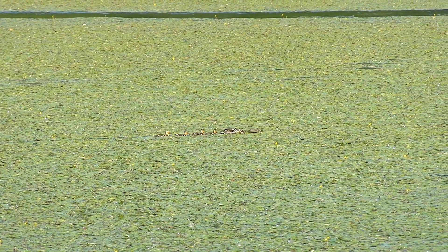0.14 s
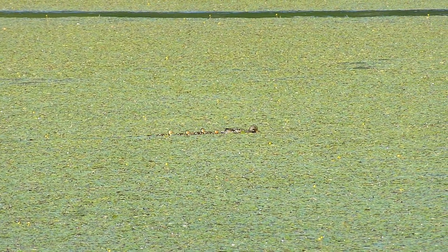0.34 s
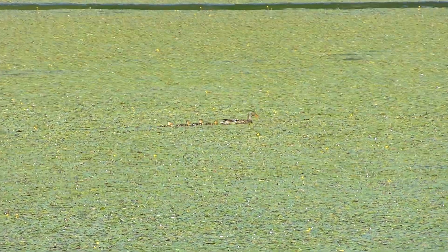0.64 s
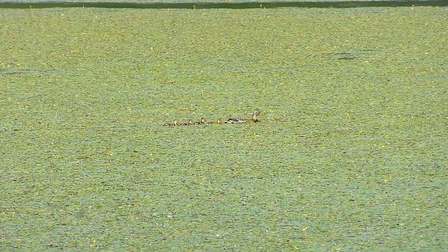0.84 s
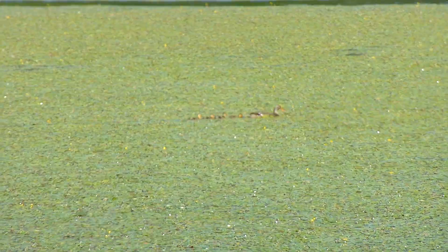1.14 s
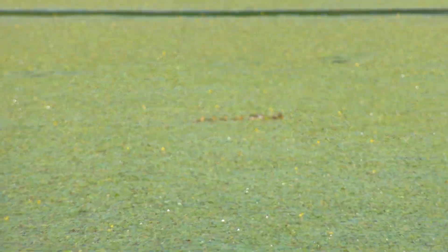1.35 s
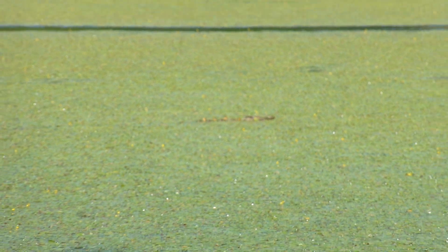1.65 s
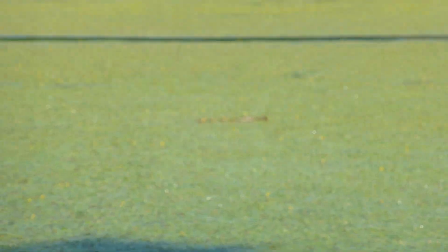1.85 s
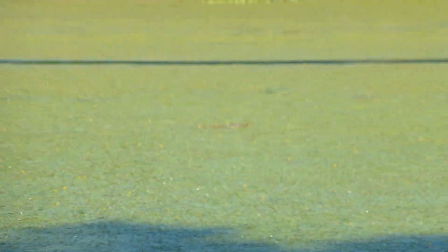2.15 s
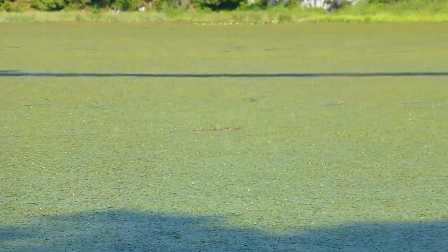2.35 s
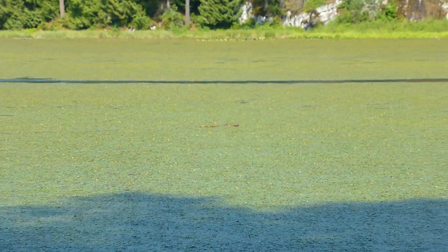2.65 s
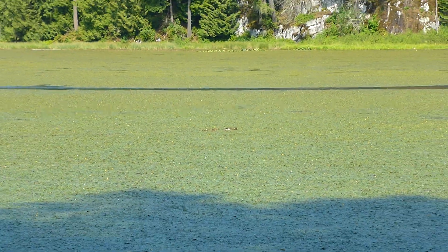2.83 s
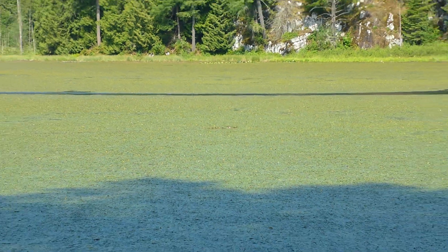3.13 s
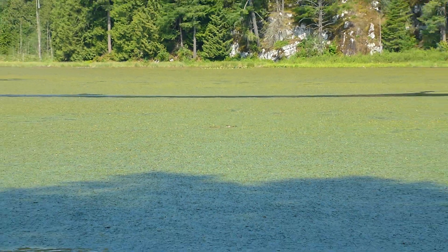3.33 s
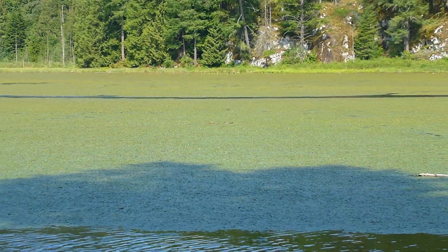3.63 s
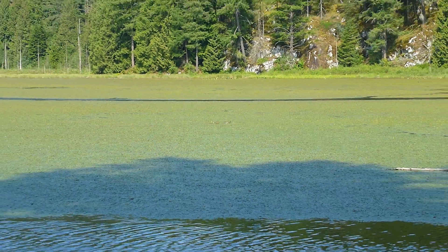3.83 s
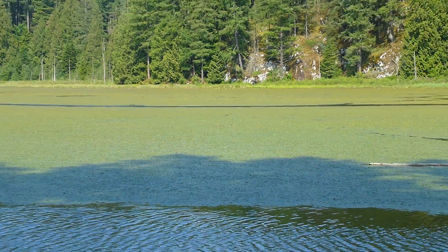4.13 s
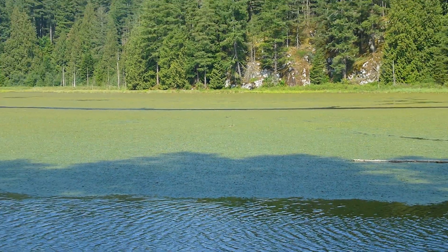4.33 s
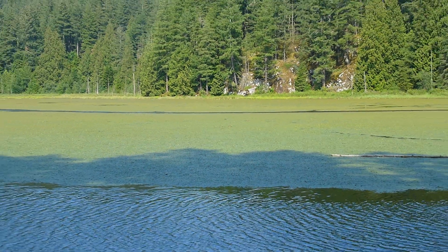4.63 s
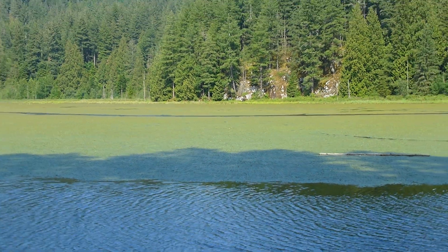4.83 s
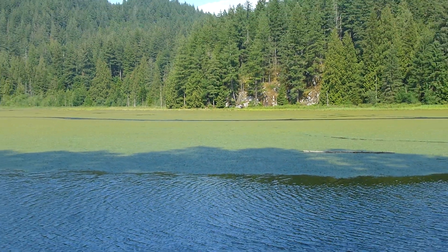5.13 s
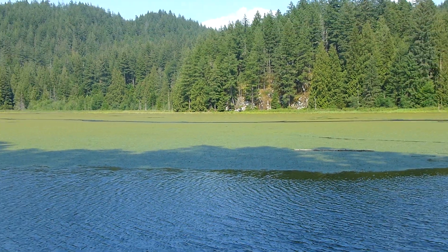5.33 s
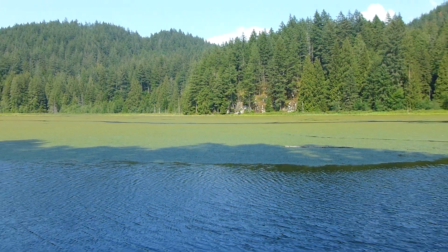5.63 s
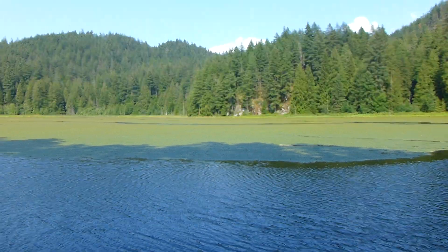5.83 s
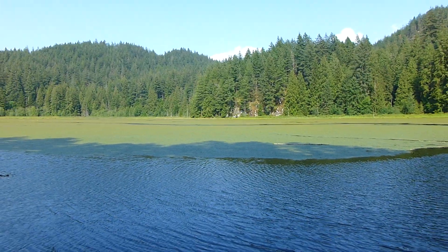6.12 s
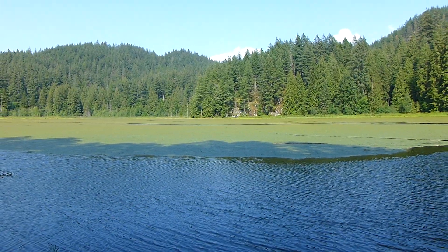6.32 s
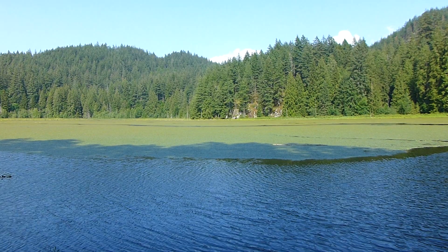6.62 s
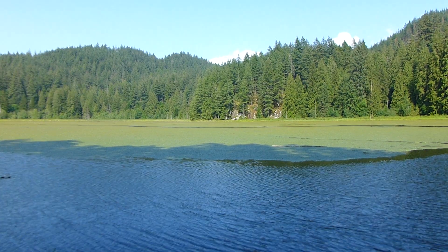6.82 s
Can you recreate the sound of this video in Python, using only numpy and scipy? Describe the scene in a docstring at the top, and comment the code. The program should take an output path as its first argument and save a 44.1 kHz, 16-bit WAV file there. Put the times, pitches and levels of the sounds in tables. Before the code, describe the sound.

Close plastic clicks and a finger rub lead into a camera lens motor whirring steadily, then cutting off with soft knocks.

```python
"""A compact camera's zoom motor runs, heard through the camera body by its built-in stereo microphones.
The gears scrape once a rotor turn and ring the barrel while the case drones. The lens groups bump in their
guides, plastic parts tick and the focus drive hisses in short runs. A finger rubs and pushes the lever,
then lets go with dull thuds. Faint open air lies behind."""
import sys
import numpy as np
from scipy import signal
from scipy.fft import rfft, irfft
from scipy.io import wavfile
from scipy.ndimage import uniform_filter1d

SR = 44100
rng = np.random.default_rng(int(sys.argv[2]) if len(sys.argv) > 2 else 0)


def unload_wav(signal):
    """Save mono or channel-first audio to the path in sys.argv[1] as 16-bit WAV at rate SR, clipped to [-1, 1]."""
    wavfile.write(
        sys.argv[1],
        SR,
        np.round(np.clip(np.atleast_2d(signal).T, -1, 1) * 32767).astype(np.int16),
    )


N = 307377
TIME = np.arange(N) / SR
START_S, STOP_S, ROTOR_HZ = 0.738, 6.466, 186.8


def undb(db):
    """Decibels to gain."""
    return 10 ** (np.asarray(db) / 20)


def unit(x):
    """Scale to rms 1."""
    return x / np.sqrt(np.mean(x ** 2))


def curve(rows):
    """Each column after the first, joined by straight lines in time."""
    times_s, *columns = np.transpose(rows)
    return np.squeeze([np.interp(TIME, times_s, column) for column in columns])


def strokes(rows, attack_s, release_s):
    """Gain that rises, holds and dies away. Each row: start in seconds, length in seconds, level in dB."""
    return sum(undb(db) * np.clip((TIME - start_s) / attack_s, 0, 1)
               * np.exp(-np.maximum(TIME - start_s - length_s, 0) / release_s)
               for start_s, length_s, db in rows)


def noise():
    """White noise."""
    return rng.standard_normal(N)


def walk(rate_hz):
    """Smooth random wander, rms 1."""
    knots = rng.standard_normal(int(N / SR * rate_hz) + 3)
    return unit(np.interp(TIME * rate_hz, np.arange(len(knots)), knots))


def butter(x, hz, kind, order):
    """Butterworth low- or high-pass."""
    return signal.sosfilt(signal.butter(order, hz, kind, fs=SR, output="sos"), x + 1e-18)


def colour(x, outline):
    """Minimum-phase filter. Each row: frequency in Hz, gain in dB."""
    hz, db = np.transpose(outline)
    bins_hz = np.fft.rfftfreq(N, 1 / SR) + 1e-3
    gain = undb(np.interp(np.log(bins_hz), np.log(hz), db))
    cepstrum = irfft(np.log(gain), N)
    cepstrum[1:] *= 2 * (np.arange(1, N) < N // 2)
    return irfft(rfft(x) * np.exp(rfft(cepstrum)), N)


def ring(force, modes, wander_db=0.74):
    """Friction noise under a varying force excites resonances that swell independently; rms 1."""
    ringing = 0
    for hz, width_hz, db in modes:
        b, a = signal.iirpeak(hz, hz / width_hz, SR)
        swell = undb(db + wander_db * walk(11))
        ringing += swell * signal.lfilter(b, a, signal.lfilter(b, a, force * noise()))
    return unit(ringing)


def rotor_turns(wobble=0.024):
    """Turns made by the rotor, whose speed wavers a little."""
    return np.cumsum(ROTOR_HZ * (1 + wobble * walk(30))) / SR


def gear_contact(turns, grip=2.6, grip_s=0.00035, backlash_s=0.00013, peak_load_s=3.87, load_span_s=3.7):
    """Teeth catch once a turn, hardest on every third turn and in mid travel. Returns force and clicks."""
    turn = turns.astype(int)
    scatter, late = rng.standard_normal((N // 100, 2)).T
    load = np.exp(-((TIME - peak_load_s) / load_span_s) ** 2)
    strength = load * undb(2 * scatter[turn] + 0.5 * (turn % 3 == 0))
    force = 1 + grip * strength * np.exp(-(turns % 1) / ROTOR_HZ / grip_s)
    starts = np.flatnonzero(np.diff(turn)) + 1
    play = (backlash_s * SR * late[:len(starts)]).astype(int)
    clicks = np.bincount(np.clip(starts + play, 0, N - 1), strength[starts], N)
    return force / np.sqrt(uniform_filter1d(force ** 2, SR // 10)), clicks


def zoom_motor(turns, contact, clicks, output_turn_s=0.274, tight_spot_s=4.065):
    """Gears click, scrape and ring their box; the sliding barrel and the brushes sound with them."""
    # Each row: time in seconds, relative rasp level in dB, relative whine level in dB.
    gear_load = [(.8, -50, -50), (1.05, -45, -50), (1.25, -46.5, -51), (1.55, -43, -48.5), (2.1, -41, -48),
                 (2.45, -44, -46), (2.65, -44, -43.5), (3.25, -42.5, -42), (3.6, -44.5, -43),
                 (4.55, -41, -42), (5.05, -39, -40), (5.22, -44, -41.5), (6.44, -43.5, -45.5)]
    # Each row: frequency in Hz, width in Hz, gain in dB.
    gearbox_modes = [(3802, 336, 1), (4520, 670, -4.5), (4855, 390, -2.5)]
    whine_modes = [(4057, 336, 0)]
    # Each row: frequency in Hz, gain in dB.
    tooth_spectrum = [(300, -42), (1500, -30), (3000, -16.5), (3550, -8.5), (4030, 0.5), (4300, -5.5),
                      (4800, -5), (5400, -18), (7500, -35.5), (15500, -44)]
    scrape_spectrum = [(40, -35), (300, -22.5), (700, -18.5), (1200, -22), (1650, -19), (2300, -16.5),
                       (3200, -14), (5500, -16.5), (7500, -51), (9000, -21), (13300, -30.5), (15500, -24.5)]
    tight = np.cos(2 * np.pi * (TIME - tight_spot_s) / output_turn_s)  # friction of the slow output gear
    rasp, whine = undb(curve(gear_load) + 0.5 * tight)
    slide = undb(-42.5 - 1.09 * (TIME - START_S) + 0.36 * tight)
    gears = rasp * ring(contact, gearbox_modes) + whine * ring(contact, whine_modes, wander_db=0.7)
    teeth = undb(-2.5) * np.sqrt(rasp * whine) * unit(colour(clicks, tooth_spectrum))
    scrape_gain = undb(-5.5) * np.sqrt(np.hypot(rasp, whine) * slide)
    scrape = scrape_gain * unit(colour(np.sqrt(contact) * noise(), scrape_spectrum))
    drive = undb(-2) * gears + teeth + scrape + barrel(contact, slide)
    sizzle = brushes(turns, tight)
    running = np.clip((TIME - START_S) / 0.015, 0, 1) * np.clip((STOP_S - TIME) / 0.001, 0, 1)
    waver, flutter = undb(0.5 * walk(14)), undb(0.5 * walk(60))
    return running * waver * (flutter * drive + sizzle)


def barrel(contact, slide, groan_rise_db_per_s=7):
    """The sliding barrel hisses, catches briefly and groans more as the lens nears the wide end."""
    # Each row: start in seconds, length in seconds, level in dB.
    catches = [(1.88, 0.07, -55), (2.34, .06, -51), (2.6, 0.077, -48), (2.9, 0.13, -55), (3.71, 0.062, -57),
               (3.97, 0.16, -59), (4.29, 0.045, -59), (4.56, 0.062, -56), (5.09, .07, -54),
               (6.17, 0.041, -56)]
    # Each row: frequency in Hz, width in Hz, gain in dB.
    barrel_modes = [(4740, 340, -1.5), (5640, 940, 2.5), (6400, 1300, -3.5)]
    groan_modes = [(1300, 340, 0), (2100, 450, -5)]
    friction = undb(-3) * slide + strokes(catches, attack_s=0.025, release_s=0.023)
    hiss = friction * ring(np.sqrt(contact), barrel_modes)
    groan = undb(-49 - groan_rise_db_per_s * (STOP_S - TIME)) * ring(contact, groan_modes)
    return hiss + groan


def brushes(turns, tight, sizzle_db=1.84, pinion_db=1.5):
    """Brushes sizzle in the motor can, swelling every third turn."""
    # Each row: time in seconds, relative level in dB.
    brush_levels = [(.8, -46.5), (1.55, -45), (2.3, -45), (2.7, -43), (3.8, -46.5), (4.4, -44), (5.1, -44),
                    (5.35, -47), (6.44, -44.5)]
    # Each row: frequency in Hz, width in Hz, gain in dB.
    can_modes = [(8240, 790, -3), (9415, 1020, 1.5), (11040, 860, -1), (12830, 1200, -4.5)]
    force = undb(sizzle_db * walk(150) + pinion_db * np.cos(2 * np.pi * turns / 3))
    return undb(curve(brush_levels) - 1.5 + 0.75 * tight) * ring(force, can_modes, wander_db=0.8)


def case_drone(hum_hz=176, hum_width_hz=55, hum_rest_db=-72):
    """Hand and gear train shake the case: low resonances over an uneven rumble."""
    # Each row: time in seconds, relative drone level in dB, relative rumble level in dB.
    shake = [(0, -50, -62), (.55, -55, -56.5), (.7, -47, -60.5), (1.3, -48.5, -59.5), (1.8, -45.5, -51),
             (2.3, -41.5, -45.5), (2.8, -42.5, -49.5), (3.45, -42.5, -49.5), (3.9, -46, -53),
             (4.95, -45.5, -51), (5.6, -50.5, -53), (6.2, -46, -48.5), (6.45, -50, -50.5), (6.5, -54, -58),
             (6.58, -45.5, -49), (6.72, -62, -79), (6.97, -68, -57)]
    # Each row: frequency in Hz, width in Hz, gain in dB.
    case_modes = [(436.3, 59.7, 0.5), (561, 44, -15)]
    # Each row: centre in seconds, half length in seconds, level in dB.
    grip_booms = [(.27, 0.57, -55.5), (0.85, 0.21, -54.5), (3.4, 0.42, -55.5), (5.29, 0.18, -55)]
    # Each row: frequency in Hz, gain in dB.
    rumble_spectrum = [(40, -50), (70, -34), (110, -16), (180, -4.5), (290, 0.5), (400, 3), (455, -2.5),
                       (500, -17.5), (600, -13), (800, -19.5), (1500, -28)]
    drone_db, rumble_db = curve(shake)
    tone = undb(drone_db + 1 + walk(22)) * ring(1, case_modes)
    grip = sum(undb(db) * np.exp(-((TIME - at_s) / half_s) ** 2) for at_s, half_s, db in grip_booms)
    hum = (undb(hum_rest_db) + grip) * ring(1, [(hum_hz, hum_width_hz, 0)])
    surges = noise() * undb(2.5 * walk(30))
    return tone + hum + undb(rumble_db + 6) * unit(colour(surges, rumble_spectrum))


def case_throbs():
    """The case's main resonance swells briefly into a nearly pure tone."""
    # Each row: centre in seconds, peak in dB, half length in seconds, pitch in Hz.
    throbs = [(0.597, -30, 0.0043, 420), (0.611, -31.5, 0.004, 420), (0.772, -28, 0.0054, 430),
              (2.206, -29, 0.014, 440), (2.332, -31, 0.0077, 435), (2.374, -30.5, .012, 444),
              (2.456, -23, 0.0082, 438), (2.66, -28.5, .016, 427), (2.811, -27, 0.008, 438),
              (2.865, -27.5, 0.0089, 400), (3.091, -28.5, 0.0047, 426), (3.402, -32, 0.0094, 448),
              (4.309, -33, 0.0065, 424), (4.36, -30.5, 0.0066, 437), (5.412, -31.5, 0.011, 440),
              (6.223, -33, 0.011, 445)]
    return sum(undb(db) * np.exp(-((TIME - at_s) / half_s) ** 2) * np.sin(2 * np.pi * hz * (TIME - at_s))
               for at_s, db, half_s, hz in throbs)


def knocks(rows, push, wind_cut_hz=265, pan_db=-6.5, sharp_ms=0.43):
    """The microphones' wind filter turns each push on the case into a swing. Returns mid and side."""
    mid, side, t_ms = np.zeros(N), np.zeros(N), 1000 * TIME[:SR // 25]
    for start_s, db, rise_ms, bass_hz in rows:
        swing = -butter(push(rise_ms, t_ms), wind_cut_hz, "high", order=2)
        swing = butter(swing, bass_hz, "high", order=2)
        swing *= undb(db) / np.abs(swing).max()
        left = undb(pan_db * (rise_ms > sharp_ms))  # all but the sharpest lean right
        mid[int(start_s * SR):][:len(t_ms)] += swing
        side[int(start_s * SR):][:len(t_ms)] += swing * (left - 1) / (left + 1)
    return np.array([mid, side])


def pulse(rise_ms, t_ms, roundness):
    """Smooth force pulse, peak 1 at rise_ms."""
    phase = t_ms / rise_ms
    return (phase * np.exp(1 - phase)) ** roundness


def lens_bumps(roundness=5.5, soft_ms=2.46, case_cut_hz=2000, spread_hz=300):
    """Lens groups and lever bump the case, one small edge first. Returns mid and side."""
    # Each row: start in seconds, peak in dB, rise in ms, bass cutoff in Hz.
    bumps = [(0.1358, -19.5, 1.83, 90), (0.197, -28, 0.74, 150), (.2225, -29, 1.35, 150),
             (.25, -36, 1.2, 200), (.279, -39, 1.9, 130), (.307, -35, 1.3, 180), (0.4916, -21.5, 1.5, 89.5),
             (.516, -32, 3.5, 130), (0.5925, -26, 0.47, 200), (.764, -33, 0.38, 200),
             (0.767, -25, 1.34, 100), (0.8061, -25.5, 1.2, 130), (1.032, -37, 3.3, 90),
             (1.1473, -12.5, 0.37, 294), (1.306, -39, 2.6, 110), (1.494, -30.5, 0.86, 110),
             (1.592, -38, 3.4, 60), (1.78, -31, 0.49, 200), (1.815, -24.5, 0.6, 130),
             (2.0594, -25.5, 1.35, 130), (2.336, -26, 1.1, 130), (2.4463, -24.5, 0.93, 150),
             (2.9847, -21, 0.87, 100), (3.2835, -26, 0.54, 110), (3.4782, -11, 0.68, 50.4),
             (3.575, -23.5, 1.3, 110), (3.672, -33, 2.5, 120), (4.09, -31.5, 0.75, 200),
             (4.367, -25.5, 0.81, 150), (4.399, -30.5, 0.69, 110), (4.714, -36, 0.77, 170),
             (4.747, -24, 1.35, 121), (4.8914, -24, 0.8, 130), (4.96, -25.5, 0.67, 130),
             (5.042, -27, 1.1, 130), (5.0717, -24, 0.9, 130), (5.2632, -18, 0.77, 70),
             (5.287, -14, 1.9, 90), (5.38, -26, 1.1, 150), (6.299, -29.5, 0.45, 250),
             (6.4852, -23.5, 0.45, 170)]

    def hard_push(rise_ms, t_ms):
        hardness = max(1 - (rise_ms / soft_ms) ** 4, 0)
        edge = 2 * undb(-19) * hardness * pulse(0.13 * rise_ms, t_ms, roundness)
        push = butter(pulse(rise_ms, t_ms, roundness) + edge, case_cut_hz, "low", order=4)
        return 2 * butter(push, spread_hz, "low", order=1) - push  # lows cross the case later than highs

    return knocks(bumps, hard_push)


def release_thuds(skin_hz=900):
    """The finger lets go of the lever: pushes cushioned by the fingertip. Returns mid and side."""
    # Each row: start in seconds, peak in dB, rise in ms, bass cutoff in Hz.
    thuds = [(6.4612, -18, 1.1, 280), (6.4632, -13, 1.6, 262), (6.4708, -13, 1.66, 220),
             (6.5448, -9, 1.6, 201), (6.5573, -13, 1.87, 171), (6.64, -16, 1.46, 170),
             (6.7008, -11.5, 1.58, 140)]

    def soft_push(rise_ms, t_ms):
        return butter(pulse(rise_ms, t_ms, roundness=4), skin_hz, "low", order=5)

    return knocks(thuds, soft_push)


def plastic_ticks(build_s=0.00019, decay_s=0.0013, part_q=10):
    """A sharp contact and brief chatter ring the struck part and the shell; low parts touch more softly."""
    # Each row: start in seconds, relative level in dB, pitch of the part in Hz, gain of its ring in dB.
    ticks = [(.572, -36, 5000, 6), (0.5918, -16, 2580, 6), (0.596, -20, 2000, 14), (0.614, -20, 4340, 6),
             (.671, -17, 4180, 15.5), (0.698, -24, 4100, 16), (0.7157, -19.5, 3500, 4),
             (0.737, -26.5, 8800, 14), (0.7638, -19, 2600, 6), (0.77, -22.5, 2800, 6),
             (1.1468, -15.5, 1170, 10), (1.147, -20.5, 3600, 14), (1.9849, -21, 3580, 19),
             (3.478, -19, 1720, 9), (4.033, -31, 4720, 14), (4.576, -24, 4000, 20), (5.287, -24, 1900, 10),
             (6.0232, -13.5, 3250, 12), (6.0242, -18, 5200, 4), (6.486, -22.5, 3560, 12),
             (6.534, -22, 4600, 9), (6.5902, -18.5, 4080, 17), (6.592, -22, 4670, 10),
             (6.6085, -29, 4100, 12), (6.629, -29, 2500, 12), (6.667, -32, 4250, 15),
             (6.868, -38, 4400, 19), (6.918, -34.5, 4000, 17)]
    # Each row: frequency in Hz, gain in dB.
    shell_spectrum = [(40, -28), (300, -7), (1200, -1.5), (2000, -8.5), (2800, -8), (3600, 0), (4150, 3),
                      (4900, 6), (5700, -11), (7500, -20), (9500, -13), (12000, -32), (15500, -26)]
    blows, parts, t = np.zeros(N), np.zeros(N), TIME[:SR // 100]
    chatter = 0.33 * np.minimum(t / build_s, 1) * np.exp(-t / decay_s)
    for start_s, db, hz, part_db in ticks:
        blow = undb(db) * ((t == 0) + chatter * rng.standard_normal(len(t)))
        part = signal.lfilter(*signal.iirpeak(hz, part_q, SR), blow)
        blows[int(start_s * SR):][:len(t)] += butter(blow, 1.57 * hz, "low", order=2)
        parts[int(start_s * SR):][:len(t)] += undb(part_db) * part
    return undb(9) * colour(blows, shell_spectrum) + parts


def focus_drive(width_hz=1700, flutter_db=4):
    """A smaller, faster drive hisses at another pitch on each run."""
    # Each row: start in seconds, length in seconds, level in dB, pitch in Hz.
    runs = [(0.723, 0.013, -37, 8860), (0.918, 0.213, -44, 10100), (1.297, 0.13, -47.5, 10300),
            (1.868, 0.31, -48.5, 9000), (4.56, 0.12, -45.5, 9850), (4.8, 0.075, -49, 9200)]
    flutter = undb(flutter_db * walk(90))
    return sum(strokes([run], attack_s=0.014, release_s=0.008) * ring(flutter, [(hz, width_hz, 0)])
               for *run, hz in runs)


def finger(slip_db=2.2, fidget_db=2):
    """Skin and lever slide over the shell in small slips; the resting finger fidgets faintly."""
    # Each row: start in seconds, length in seconds, level in dB.
    rubs = [(.014, .025, -47.5), (.365, 0.023, -53), (.505, 0.0069, -56), (.58, 0.011, -45),
            (.592, 0.035, -36.5), (.635, .02, -44), (.657, 0.055, -38), (.716, 0.019, -34.5),
            (3.745, .012, -43), (4.025, 0.0066, -38), (4.145, .012, -45), (5.037, 0.0054, -37),
            (6.533, 0.058, -48.5)]
    # Each row: time in seconds, level in dB.
    resting_levels = [(0, -56.5), (6.67, -54.5), (6.71, -64), (6.78, -61.5), (6.97, -57.5)]
    # Each row: frequency in Hz, gain in dB.
    rub_spectrum = [(40, -46), (300, -3.5), (1200, -7.5), (2000, -12), (2800, -6.5), (3700, 0.5),
                    (4270, 7.5), (4900, -1), (5700, -7), (7500, -17), (9500, -13.5), (12000, -34),
                    (13600, -24), (15000, -40)]
    slips, fidget = undb(slip_db * walk(400)), undb(fidget_db * walk(35))
    pressure = strokes(rubs, attack_s=0.0053, release_s=0.0067) + undb(curve(resting_levels)) * fidget
    return pressure * unit(colour(noise() * slips, rub_spectrum))


def idle_mechanism(level_db=-56.5, end_s=6.1, fade_s=0.036):
    """The powered lens mechanism rings faintly."""
    # Each row: frequency in Hz, width in Hz, gain in dB.
    idle_modes = [(1180, 630, 1), (2215, 510, -4), (4040, 110, -5)]
    return undb(level_db) * np.clip((end_s - TIME) / fade_s, 0, 1) * ring(1, idle_modes)


def open_air(level_db=-54.5):
    """Steady outdoor air and microphone hiss."""
    # Each row: frequency in Hz, gain in dB.
    air_spectrum = [(25, -13), (60, -12), (150, -8.5), (320, 9), (600, -0.5), (1200, -9), (2500, -14),
                    (6000, -19.5), (10000, -23.5), (15500, -35)]
    return undb(level_db) * unit(colour(noise(), air_spectrum))


def widen(x, low_hz, order, high_hz=700, gain_db=6.5):
    """Side signal: the small difference between two close ports, boosted in the middle range."""
    return undb(gain_db) * butter(butter(x, low_hz, "high", order), high_hz, "low", order=1)


def scene(stray_hz=1400, port_lag=0.13, drone_lean=0.23):
    """Case-borne sound leans right; stray whir, mostly its lows, reaches the ports by unrelated paths."""
    turns = rotor_turns()
    contact, clicks = gear_contact(turns)
    lens = zoom_motor(turns, contact, clicks) + focus_drive()
    lens += finger() + plastic_ticks() + idle_mechanism()
    stray = zoom_motor(turns, contact, clicks) + finger() + idle_mechanism()
    stray = undb(-3) * stray + undb(9) * butter(stray, stray_hz, "low", order=4)
    drone = case_drone() + case_throbs()
    knock_mid, knock_side = lens_bumps() + release_thuds()
    mid = lens + drone + knock_mid + open_air()
    side = knock_side - drone_lean * drone
    side += undb(-0.6) * widen(lens, low_hz=370, order=2)
    side += widen(stray + undb(-5.5) * drone, low_hz=582, order=4)
    side += undb(-0.5) * widen(knock_mid, low_hz=746, order=4)
    side -= port_lag * np.gradient(lens)  # the left port hears the lens slightly later
    side += undb(-4) * open_air() + undb(-22) * case_drone()
    return np.array([mid + side, mid - side])


def record(dry, port_hz=14200, top_hz=15450):
    """The ports soften the highest treble and the camera cuts the top."""
    soft = butter(dry, port_hz, "low", order=3)
    return signal.sosfilt(signal.ellip(10, 0.2, 80, top_hz, fs=SR, output="sos"), soft)


dry = scene()
out = record(dry)
unload_wav(out)
```